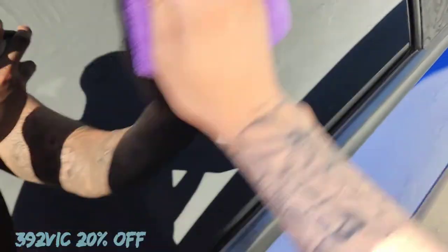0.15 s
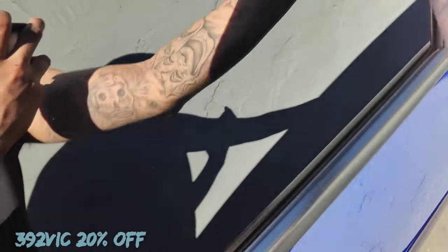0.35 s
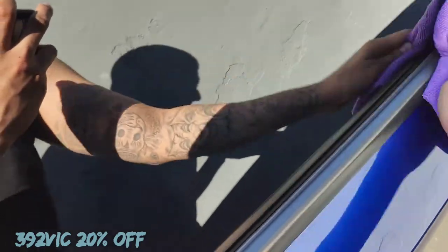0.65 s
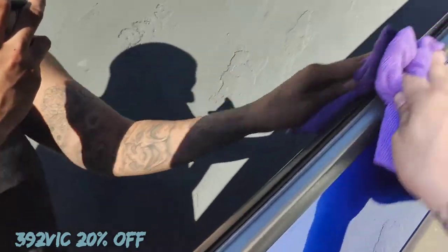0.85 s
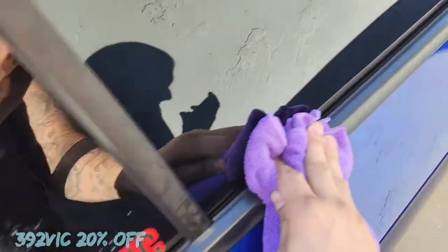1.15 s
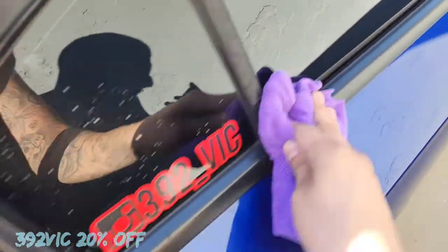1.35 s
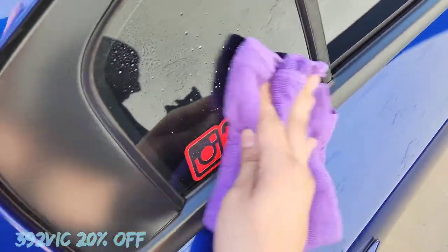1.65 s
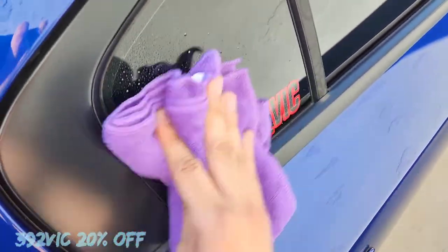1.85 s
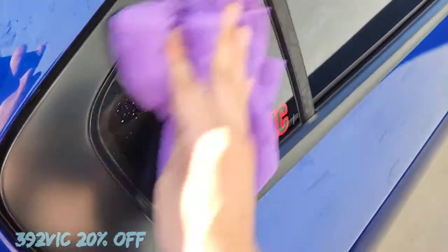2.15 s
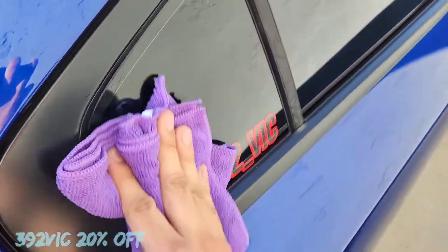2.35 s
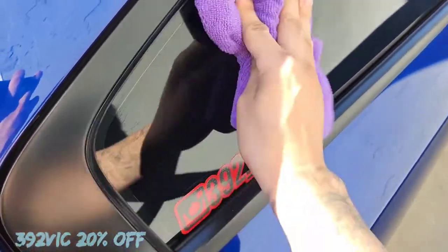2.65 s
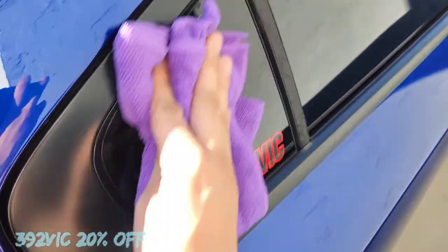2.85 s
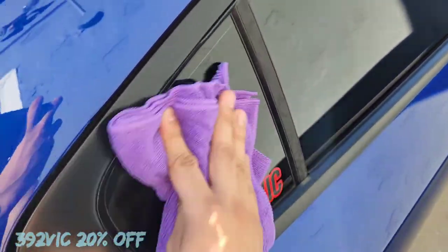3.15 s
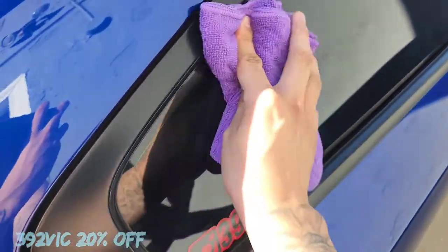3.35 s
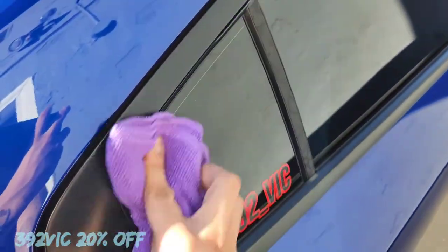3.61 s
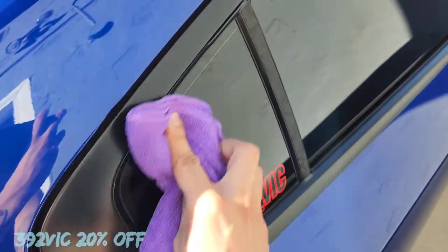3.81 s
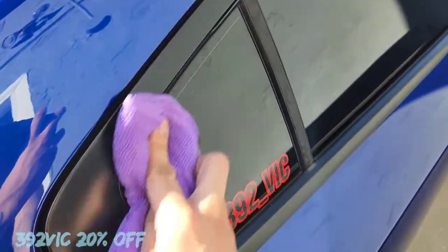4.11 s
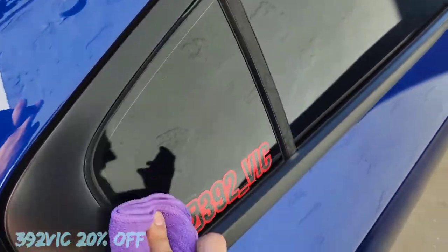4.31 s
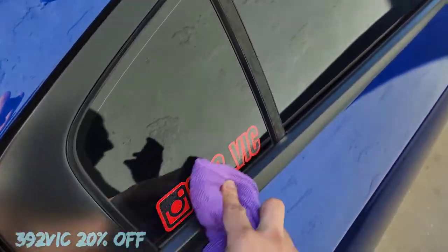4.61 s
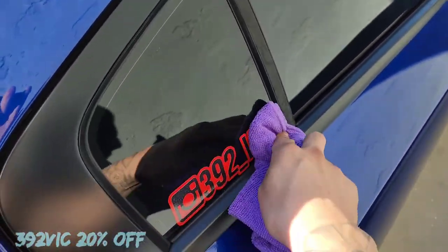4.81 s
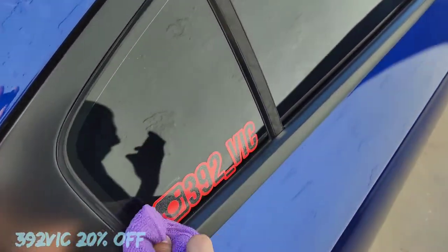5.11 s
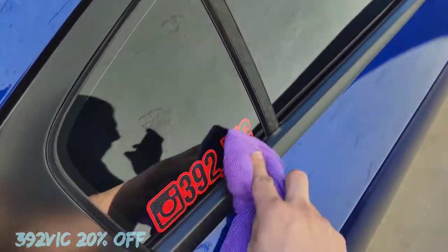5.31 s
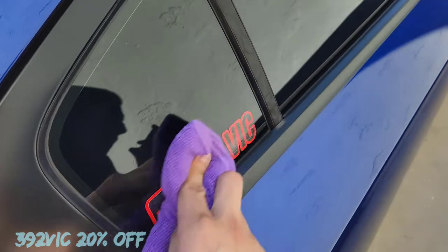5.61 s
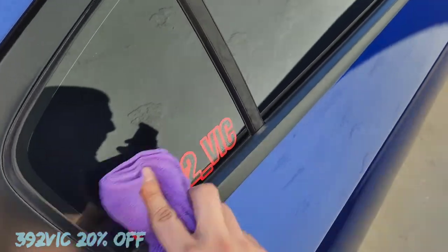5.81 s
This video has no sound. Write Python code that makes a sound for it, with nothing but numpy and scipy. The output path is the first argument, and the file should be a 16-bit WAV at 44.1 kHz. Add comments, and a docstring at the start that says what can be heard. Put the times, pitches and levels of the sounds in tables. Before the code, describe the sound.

Close to the microphone outdoors, a towel wipes a car's side window in soft, uneven hissing strokes. Early on, a sharp tick leads into the loudest swish. From halfway, wind buffets the microphone harder with low thumps, and near the end the towel drags over the trim three times with a fuller, lower rub. A steady motor hum and distant traffic rumble run underneath.

```python
"""A hand wipes a car's side window with a folded towel, outdoors, close to a pair of microphone ports.
Soft strokes open the scene: fibres catching on glass hiss, over light wind, a motor's mains hum, distant
traffic and insects, which last throughout. Near 1.4 s a sharp tick leads into the loudest hiss. From 3 s
the wind buffets the ports harder. Near 4.4, 4.9 and 5.5 s the towel drags over trim and seals, and
stick-slip friction drives the lower modes of pane and door."""
import sys
import numpy as np
from scipy import signal
from scipy.io import wavfile
from scipy.ndimage import uniform_filter1d

SR = 44100
rng = np.random.default_rng(int(sys.argv[2]) if len(sys.argv) > 2 else 0)


def unload_audio(sound):
    """Save the sound as a 16-bit wav file, at the path given as the first command line argument."""
    columns = np.transpose(np.atleast_2d(sound))
    # keep every value between -1 and 1, then stretch to whole-number steps
    steps = np.round(np.clip(columns, -1, 1) * 32767)
    wavfile.write(sys.argv[1], SR, steps.astype(np.int16))


N = 262968

# modes of the glass pane: (frequency [Hz], bandwidth [Hz], relative level [dB])
PANE_MODES = [(767, 250, -3), (1157, 410, 0), (1580, 496, -2.5), (2070, 320, -5), (3430, 500, -20.5)]
# modes of the door skin: (frequency [Hz], bandwidth [Hz], relative level [dB])
DOOR_MODES = [(280.4, 20.5, 3), (390, 110, -0.5), (558, 69, 0)]
# resonances of the squeezed cloth: (frequency [Hz], bandwidth [Hz], relative level [dB])
CLOTH_MODES = [(3470, 780, 6), (4430, 410, 8), (6000, 280, -3.5), (7250, 2100, 4.5)]
def towel():
    """Stick-slip friction: dense catches hiss and ring in the cloth; sparser ones drive pane and door."""
    hiss_db, bright_db, pane_db, door_db = strokes()
    hiss = fibre_hiss(bright_db)
    drag = catches(per_s=2000, spread_db=3, shape=(3, N)) * from_db(1.5 * drift(60))
    cloth_catches = catches(per_s=5000, spread_db=6.1, shape=(3, N))
    cloth = modes(cloth_catches, CLOTH_MODES, flicker_db=-7)
    rub = from_db(hiss_db + 0.8 * drift(45)) * (from_db(9.5) * hiss + from_db(-12) * cloth)
    pane = from_db(pane_db - 2.5) * modes(drag, PANE_MODES, flicker_db=-3.5)
    window = rub + pane + rings()
    door = from_db(door_db) * modes(drag[::-1], DOOR_MODES, flicker_db=1.5)
    return to_ports(window, scattered=0.55) + to_ports(door, scattered=0.35, width=0.05)


# strokes of the towel, levels relative: (time at full speed [s], rise [s], hold [s], fall [s],
# hiss [dB], brightness [dB], pane drag [dB], door drag [dB])
TOWEL_STROKES = [ (0.147, 0.085, 0.17, 0.033, -59, -5.5, -70, -67),
                 (0.285, 0.069, 0.061, 0.01, -59, -8, -55.5, -60),
                 (0.432, 0.074, 0.14, 0.14, -58.5, -9, -59, -83),
                 (0.8, 0.13, 0.25, 0.089, -68.5, -13, -82, -65),
                 (1.14, 0.49, 0.054, .08, -64, -12.5, -68, -77),
                 (1.26, 0.079, 0.013, 0.047, -65, -6.5, -62, -57.5),
                 (1.337, 0.023, 0.037, 0.025, -54.5, -31, -56, -53.5),
                 (1.39, 0.014, 0.046, 0.084, -35.5, -20.5, -42, -56.5),
                 (1.461, .05, 0.059, 0.065, -36.5, -16, -48.5, -62),
                 (1.607, .015, 0.072, 0.051, -45.5, -15.5, -46.5, -57),
                 (1.736, 0.071, 0.018, 0.052, -58, -15, -57, -55),
                 (1.843, .05, 0.022, 0.12, -66, -20, -75, -67),
                 (1.962, 0.095, 0.027, 0.042, -65, -5, -58.5, -60),
                 (2.163, 0.22, 0.1, 0.068, -61, -14.5, -63, -64),
                 (2.427, 0.077, .02, 0.11, -62, -17, -70, -61), (2.489, .03, .01, 0.045, -65, -7, -65, -73),
                 (2.567, 0.058, 0.048, 0.032, -63.5, -10, -61.5, -60),
                 (2.816, 0.13, 0.06, 0.17, -62.5, -12.5, -69, -66),
                 (3.038, 0.025, 0.11, 0.0097, -69.5, -15, -67, -79),
                 (3.125, 0.036, 0.12, 0.06, -67.5, -6, -79, -74),
                 (3.225, 0.057, 0.079, 0.084, -64.5, -13, -60.5, -76),
                 (3.46, 0.068, 0.047, .06, -69, -27, -67, -82),
                 (3.547, 0.15, 0.1, 0.061, -61, -8.5, -61.5, -83),
                 (3.776, 0.055, 0.069, 0.12, -64.5, -27, -65, -66),
                 (3.91, 0.04, 0.022, 0.047, -59.5, -11.5, -57, -65),
                 (4.053, 0.062, 0.09, 0.071, -62, -6.5, -62.5, -79),
                 (4.141, 0.035, 0.033, 0.036, -57, -14, -50.5, -56.5),
                 (4.206, 0.061, 0.11, .05, -68.5, -15, -88, -72),
                 (4.348, 0.011, 0.017, .03, -60, -3, -52, -48.5),
                 (4.384, 0.026, 0.0099, 0.017, -46.5, -14, -38, -41),
                 (4.42, 0.022, 0.0075, 0.052, -59, -18, -48.5, -44),
                 (4.489, 0.01, 0.027, 0.037, -59, -23, -49, -58.5),
                 (4.534, 0.056, 0.046, 0.077, -68, -6, -81, -62),
                 (4.668, 0.033, 0.0071, 0.13, -52, -13, -51, -59),
                 (4.911, 0.069, 0.06, 0.093, -50.5, -14.5, -44.5, -45),
                 (5.088, 0.14, 0.12, 0.041, -74, -26, -62, -72),
                 (5.205, 0.036, 0.006, 0.055, -64.5, -8, -51, -51.5),
                 (5.35, 0.15, 0.069, 0.027, -77, -4, -78, -80),
                 (5.531, 0.097, 0.057, 0.12, -49.5, -8, -43, -46),
                 (5.783, 0.031, 0.055, 0.062, -62, -13.5, -59, -54.5),
                 (5.878, 0.085, 0.025, 0.049, -60, -7.5, -52, -56.5),
                 (5.96, 0.054, .01, .05, -64.5, -6, -53.5, -54), ]
# the towel nearly still: (hiss [dB], brightness [dB], pane drag [dB], door drag [dB])
TOWEL_AT_REST = (-85, -5.5, -72.5, -66.5)
SWING_DB, DRAG_FOLLOWS = 20, 0.99   # change over a rise or fall; share of it reaching pane and door
def strokes():
    """Incoherent addition: overlapping strokes sum in power; brightness is their power-weighted mean."""
    t = np.arange(0, N + 64, 64) / SR
    onset, rise, hold, fall, hiss_db, bright_db, pane_db, door_db = np.transpose(TOWEL_STROKES)[:, :, None]
    rest_hiss, rest_bright, rest_pane, rest_door = TOWEL_AT_REST
    before, after = (onset - t) / rise, (t - onset - hold) / fall
    slack_db = -SWING_DB * np.maximum(0, np.maximum(before, after))
    power = from_db(2 * (hiss_db + slack_db))
    hiss = power.sum(axis=0) + from_db(2 * rest_hiss)
    bright = ((power * bright_db).sum(axis=0) + from_db(2 * rest_hiss) * rest_bright) / hiss
    pane = from_db(2 * (pane_db + DRAG_FOLLOWS * slack_db)).sum(axis=0) + from_db(2 * rest_pane)
    door = from_db(2 * (door_db + DRAG_FOLLOWS * slack_db)).sum(axis=0) + from_db(2 * rest_door)
    return in_time(np.transpose([t, 10 * np.log10(hiss), bright, 10 * np.log10(pane), 10 * np.log10(door)]))


# spectrum of fibres on glass: (frequency [Hz], relative spectral density [dB])
FIBRE_SPECTRUM = [(500, -44), (1100, -42), (1400, -6), (2500, -9.5), (4300, -7), (6500, -8), (9500, -17),
                  (13500, -20.5), (16000, -39)]
def fibre_hiss(bright_db):
    """Shot noise: tiny catches merge into hiss, brighter when light pressure leaves only tips touching."""
    tips = catches(per_s=6000, spread_db=2.6, shape=(2, 3, N))
    bands = half_octaves(tips, FIBRE_SPECTRUM, 500, count=11, flicker_db=2.6, flicker_hz=9)
    return sum(band * from_db((bright_db + 16) * np.clip(np.log2(hz / 5000), 0, 1)) for hz, band in bands)


def catches(per_s, spread_db, shape):
    """Poisson process: fibres catch and let go at random moments, a few much harder than the rest."""
    sizes = from_db(spread_db * np.minimum(rng.exponential(1, shape), 5)) * rng.choice([-1, 1], shape)
    return unit_rms(sizes * (rng.random(shape) < per_s / SR))


def modes(force, table, flicker_db):
    """Modal superposition: each resonance is excited more or less as the contact moves; rms 1."""
    return unit_rms(sum((-1) ** k * from_db(db + flicker_db * drift(9.2)) * resonance(force, hz, width_hz)
                        for k, (hz, width_hz, db) in enumerate(table)))


# rings within some strokes: (start [s], end [s], first pitch [Hz], last pitch [Hz],
# bandwidth [Hz], level [dB])
GLIDING_RINGS = [(0.132, 0.215, 3840, 5560, 700, -63.5), (0.391, 0.588, 2710, 6740, 600, -62.5),
                 (0.493, 0.523, 1540, 1600, 300, -54), (1.39, 1.586, 4250, 4380, 600, -48),
                 (1.454, 1.52, 1366, 1380, 300, -42), (1.463, 1.508, 2170, 1930, 350, -42),
                 (1.385, 1.492, 6010, 5600, 900, -48), (4.356, 4.396, 1810, 2060, 397, -46.5),
                 (1.633, 1.665, 2500, 2700, 600, -43.5), (5.507, 5.627, 902, 936, 304, -44.5),
                 (5.535, 5.601, 1660, 1623, 150, -46.5)]
def rings():
    """Narrow-band noise: its centre frequency glides as the towel speeds up or crosses trim."""
    out = np.zeros((3, N))
    for start, end, from_hz, to_hz, width_hz, db in GLIDING_RINGS:
        i, n = round(start * SR), round((end - start) * SR)
        slow_noise = butterworth(rng.standard_normal((2, 3, 12000)), width_hz / 2)
        in_phase, quadrature = slow_noise[:, :, 2000:2000 + n]
        phase = 2 * np.pi * np.cumsum(np.geomspace(from_hz, to_hz, n)) / SR
        ring = unit_rms(in_phase * np.cos(phase) + quadrature * np.sin(phase))
        out[:, i:i + n] += from_db(db) * np.sqrt(np.hanning(n)) * ring
    return out


# seam and fingers touching the pane: (time [s], level [dB], pitch [Hz], relative snap [dB], decay [s])
TOUCHES = [(1.27, -64, 3500, 7, .007), (1.332, -47.5, 1490, -9, .0025), (1.387, -24, 2030, -18, 0.009),
           (1.604, -46, 1300, -4, 0.0054), (1.749, -55, 1080, -3, 0.0027), (2.444, -54, 3100, -15, .005),
           (2.454, -48, 820, -25, 0.0072), (2.488, -54, 3870, 7, .006), (2.572, -53, 440, -20, 0.0078),
           (2.614, -44, 870, -18, 0.0048), (3.279, -47, 4300, -4, 0.0082), (3.284, -49, 3020, 6.5, 0.0044),
           (3.483, -44, 1570, -1, 0.0012), (4.343, -50.5, 5740, -2, .008), (4.38, -33, 3280, -9, 0.014),
           (4.384, -27, 1990, -10.5, 0.0058), (4.392, -34, 1170, 7, 0.013), (4.388, -27, 530, -18, 0.0089),
           (4.404, -29.5, 526, -30, 0.0057), (4.492, -46, 1820, -19, .007), (4.899, -32, 298, -28, 0.0066),
           (4.912, -32.5, 320, -22, 0.0039), (4.95, -45, 960, -12, .004), (4.981, -44.5, 6070, 14, 0.0038),
           (5.212, -52.5, 5030, 7, 0.0081), (5.459, -53, 1200, -12, 0.0037), (5.678, -51, 1050, -8, .004),
           (5.757, -47.5, 510, -23, 0.0047), (5.782, -51, 4200, -21, 0.0033),
           (5.876, -44.5, 1580, -11, 0.0035), (5.891, -48, 1310, 2, 0.0028), (5.903, -56, 1480, 4, 0.0027)]
def ticks():
    """Impact excitation: each touch is a short noise burst in a damped resonance, with a snap on top."""
    out, t = np.zeros((3, N)), np.arange(2000) / SR
    for onset, db, hz, snap_db, decay in TOUCHES:
        burst = rng.standard_normal((3, len(t))) * (1 - np.exp(-t / 0.00027)) * np.exp(-t / decay)
        burst[0, 8] += 10   # the first contact is one hard click
        body = resonance(resonance(burst, hz, 0.4 * hz), hz, 0.3 * hz)
        snap = butterworth(burst * np.exp(-t / 0.006), [1800, 11000], "band")
        tick = body / np.abs(body[0]).max() + from_db(snap_db) * snap / np.abs(snap[0]).max()
        i = round(onset * SR)
        out[:, i:i + len(t)] += from_db(db) * tick[:, :N - i]
    return to_ports(out, scattered=0.11)


# direction of the hand, heard in the lower drag: (time [s], left minus right [dB])
HAND_PAN = [(0.0, 4), (1.24, 5), (1.42, -4.5), (1.68, -2), (1.8, 3.5), (5.96, 4)]
# treble shadow of the sweeping hand: (time [s], left minus right [dB])
TREBLE_PAN = [(0.0, 9), (0.4, -6), (0.7, -10), (1.16, 1.5), (1.64, -4.5), (1.78, 2), (2.01, -1.0),
              (2.21, 9), (2.69, -3.5), (2.87, 9), (3.0, 2), (3.05, 5), (3.37, -4), (3.6, 6), (3.95, -4),
              (4.15, 5.5), (4.76, -5.5), (4.81, 5), (5.26, -16), (5.43, -4), (5.63, 5), (5.96, -2)]
LAG_S, LAG_S_PER_DB = 0.00012, 0.00004   # left port's lag for a centred hand; its change with direction
CROSSOVER_HZ = 3250
def to_ports(sound, scattered, width=1):
    """Time and level differences place the direct sound (row 0); the bodywork scatters rows 1 and 2."""
    (pan_db,), (treble_pan_db,) = in_time(HAND_PAN), in_time(TREBLE_PAN)
    pan_db = width * pan_db
    direct, diffuse = sound[0], sound[1:]
    lag = (LAG_S - LAG_S_PER_DB * pan_db) * SR
    left = np.interp(np.arange(N) - lag, np.arange(N), direct)
    both = np.sqrt(1 - scattered) * np.array([left, direct]) + np.sqrt(scattered) * diffuse
    low = signal.sosfiltfilt(signal.butter(2, CROSSOVER_HZ, fs=SR, output="sos"), both)
    return low * pan(pan_db) + (both - low) * pan(treble_pan_db)


# strength of the buffeting: (time [s], level [dB])
GUST_LEVELS = [(0.0, -48.5), (0.38, -52), (0.79, -46.5), (1.14, -55.5), (1.3, -39.5), (1.55, -47.5),
               (1.91, -47), (1.99, -38.5), (2.4, -66), (2.48, -40.5), (2.86, -41.5), (2.92, -50),
               (3.11, -31.5), (3.35, -42), (3.51, -56), (3.68, -40), (3.87, -43), (3.93, -36), (4.18, -32),
               (4.26, -39.5), (4.47, -35.5), (4.62, -67), (4.75, -35), (5.16, -39), (5.4, -47), (5.96, -43)]
# spectrum of the buffeting: (frequency [Hz], relative spectral density [dB])
GUST_SPECTRUM = [(15, 3.5), (30, -10.5), (48, 4.5), (70, -5.5), (110, -10.5), (180, -28.5), (300, -42),
                 (600, -44)]
# puffs of wind and pushes on the door: (time [s], level [dB], frequency [Hz], left minus right [dB])
PRESSURE_PULSES = [(1.038, -28, 60.6, 6), (1.977, -28.5, 48.7, -6), (3.097, -30, 62.6, -10),
                   (3.209, -17, 89, -9.5), (3.329, -27, 73, -14), (4.04, -30, 50, 6),
                   (4.09, -28, 50.5, -14), (4.146, -24, 47.4, -9), (4.429, -22.5, 58.7, 6),
                   (4.451, -24.5, 98, 17.5), (4.739, -26.5, 60.7, -4), (4.771, -27, 56.7, 12),
                   (4.886, -26.5, 111, 16), (5.047, -21, 92, 14), (5.065, -29, 108, 19.5),
                   (5.94, -27.5, 58, 6)]
def wind():
    """Turbulent pressure at the ports: low noise swelling with the gusts, and pulses of about one cycle."""
    gust_db, = in_time(GUST_LEVELS)
    out = from_db(gust_db) * diffuse_noise(GUST_SPECTRUM, 18.06, count=10, flicker_db=-1.5, flicker_hz=2.3)
    t = np.arange(N) / SR + np.array([[0.0012], [-0.0012]])   # a puff sweeps over the left port first
    for onset, db, hz, pan_db in PRESSURE_PULSES:
        cycles = np.clip((t - onset) * hz - 0.6, -3, 3)
        pulse = -np.sin(2 * np.pi * cycles) * np.exp(-(cycles / 0.44) ** 2)
        out += from_db(db) * pan(pan_db) * pulse
    return out


# mains tones of the motor: (frequency [Hz], level [dB], wavering rate [Hz])
MAINS_TONES = [(59.03, -54.5, 11), (120.94, -48.5, 5.2), (182.2, -71.5, 9.7)]
def motor_hum():
    """Random modulation: over distance each tone wavers in level and phase, the phase differing by port."""
    t, out = np.arange(N) / SR, 0
    for hz, db, rate in MAINS_TONES:
        phase = 2 * np.pi * hz * t + 0.47 * drift(rate) + 0.05 * drift(rate) * np.array([[1], [-1]])
        out = out + from_db(db + 2 * drift(rate)) * np.sin(phase)
    return np.sqrt(2) * out * pan(0.6)


# spectrum of distant traffic: (frequency [Hz], relative spectral density [dB])
TRAFFIC_SPECTRUM = [(15, -33), (25, -12), (48, -1), (123, -4.5), (170, -5), (451, -25), (531, -42),
                    (641, -24.5), (775, -21), (1330, -34), (2050, -34.5), (2760, -41), (6000, -49),
                    (9500, -70), (16000, -79)]
TRAFFIC_DB = -47.5
def traffic():
    """Diffuse field: far vehicles merge into a low, gently wavering rumble."""
    rumble = diffuse_noise(TRAFFIC_SPECTRUM, 24.44, count=19, flicker_db=1.5, flicker_hz=4.9)
    return from_db(TRAFFIC_DB) * rumble * pan(1)


INSECT_BAND_HZ, INSECT_DB = (7070, 8560), -76.5
def insects():
    """Incoherent addition: a far chorus blurs into a thin, slowly swelling band of hiss."""
    chorus = butterworth(rng.standard_normal((2, N)), INSECT_BAND_HZ, "band", order=3)
    swell_db = 1.5 * drift(3) + 1.5 * drift(15)
    return from_db(INSECT_DB + swell_db) * unit_rms(chorus)


# likeness of wind and traffic at the two ports: (frequency [Hz], correlation [0 to 1])
PORT_COHERENCE = [(30, 0.89), (250, 0.92), (500, 0.091), (1000, 0.011), (4000, 0.017), (12000, 0.042)]
def diffuse_noise(spectrum, lowest_hz, count, flicker_db, flicker_hz):
    """Spatial coherence: spaced ports hear nearly the same bass but unrelated treble; rms 1."""
    out, noise = 0, rng.standard_normal((2, 2, N))
    for hz, (mid, side) in half_octaves(noise, spectrum, lowest_hz, count, flicker_db, flicker_hz):
        alike = at_hz(PORT_COHERENCE, hz)
        out = out + np.sqrt(1 + alike) * mid + np.sqrt(1 - alike) * side * [[1], [-1]]
    return unit_rms(out)


def half_octaves(sources, spectrum, lowest_hz, count, flicker_db, flicker_hz):
    """Filter bank: bands drawn in turn from two unrelated sources, each with its own level and flicker."""
    edges = np.minimum(lowest_hz * 2 ** (np.arange(count + 1) / 2), 0.45 * SR)
    together = drift(flicker_hz / 4)
    for k in range(count):
        hz = np.sqrt(edges[k] * edges[k + 1])
        band = butterworth(sources[k % 2], edges[k:k + 2], "band")
        yield hz, band * from_db(at_hz(spectrum, hz) + flicker_db * (0.2 * together + drift(flicker_hz)))


def drift(corner_hz):
    """Correlated noise: a slow wander of rms 1, from a double one-pole low-pass at every 40th sample."""
    r = np.exp(-2 * np.pi * corner_hz * 40 / SR)
    slow = signal.lfilter([1], [1, -2 * r, r * r], rng.standard_normal(N // 40 + 2002))[2000:]
    return np.interp(np.arange(N) / 40, np.arange(len(slow)), unit_rms(slow))


def resonance(x, hz, width_hz):
    """Damped oscillator: two poles, with a peak gain of 1."""
    r = np.exp(-np.pi * width_hz / SR)
    gain = (1 - r * r) / 2
    return signal.lfilter([gain, 0, -gain], [1, -2 * r * np.cos(2 * np.pi * hz / SR), r * r], x + 1e-18)


def butterworth(x, hz, kind="low", order=2):
    """Maximally flat filter."""
    return signal.sosfilt(signal.butter(order, hz, kind, fs=SR, output="sos"), x)


def pan(db):
    """Level difference, split evenly into left and right gains."""
    return from_db(np.vstack([db, -db]) / 2)


def from_db(db):
    """Decibels to amplitude ratio."""
    return 10 ** (np.asarray(db) / 20)


def unit_rms(x):
    """Normalisation to rms 1."""
    return x / np.sqrt(np.mean(x ** 2) + 1e-20)


def in_time(rows):
    """Linear interpolation of each column at every sample."""
    times, *columns = np.transpose(rows)
    return [np.interp(np.arange(N) / SR, times, column) for column in columns]


def at_hz(points, hz):
    """Interpolation on a log-frequency axis."""
    frequencies, values = np.transpose(points)
    return np.interp(np.log(hz), np.log(frequencies), values)


def scene():
    """Superposition: the pressures of all sources add at the two ports."""
    rumble = traffic()
    return towel() + ticks() + wind() + motor_hum() + rumble + insects()


THRESHOLD_DB, CUTOFF_HZ = -36.5, 15850
def record(dry):
    """Automatic gain control: loud bass turns the treble down; a steep low-pass then cuts the top."""
    bass = butterworth(dry, 900)
    bass_db = 10 * np.log10(uniform_filter1d(np.mean(bass ** 2, axis=0), size=2200) + 1e-12)
    treble_gain = from_db(-0.4 * np.maximum(bass_db - THRESHOLD_DB, 0))
    top_cut = signal.ellip(14, 0.5, 80, CUTOFF_HZ, fs=SR, output="sos")
    return signal.sosfilt(top_cut, bass + treble_gain * (dry - bass))


dry = scene()
out = record(dry)
unload_audio(out)
```